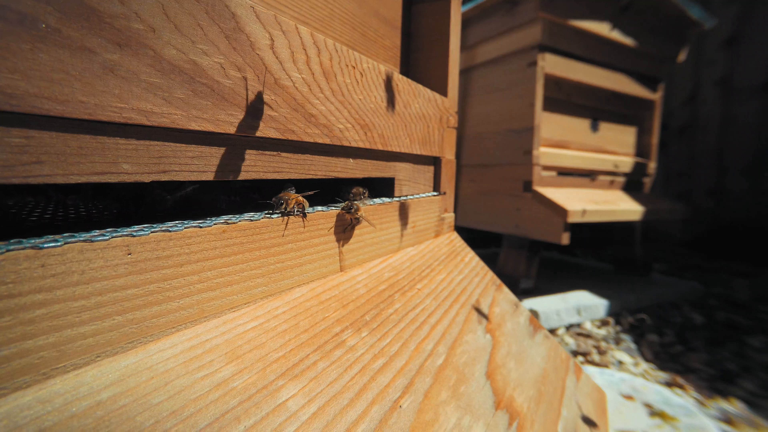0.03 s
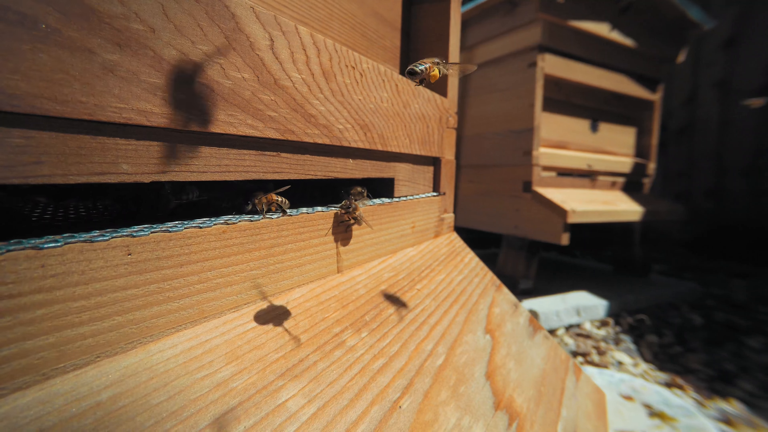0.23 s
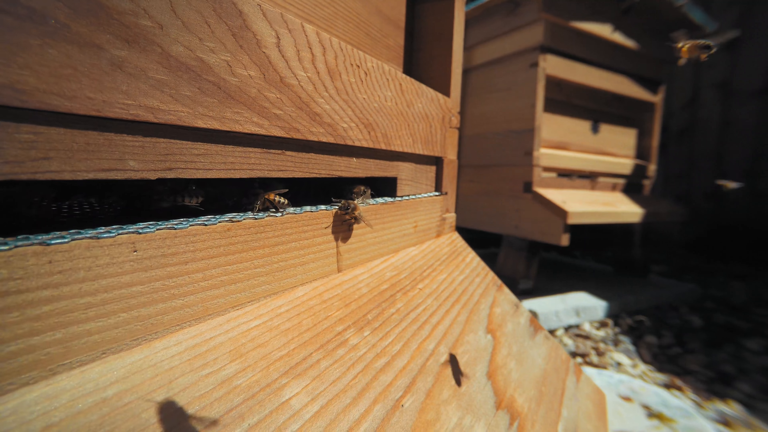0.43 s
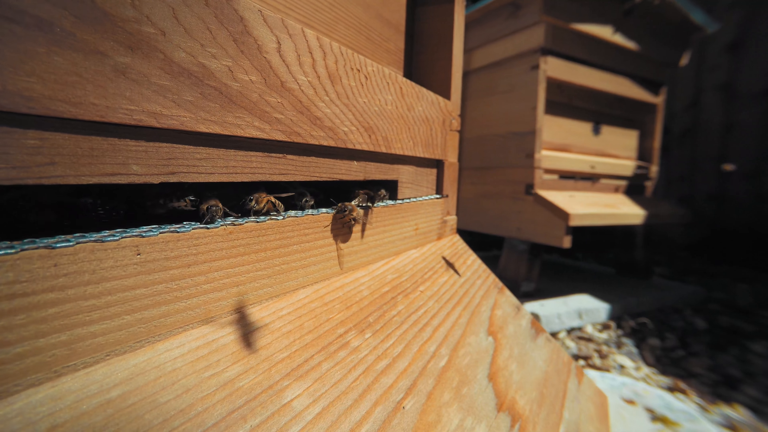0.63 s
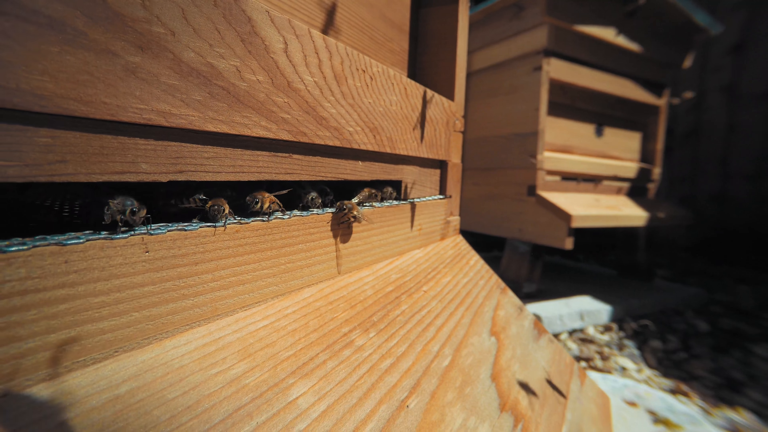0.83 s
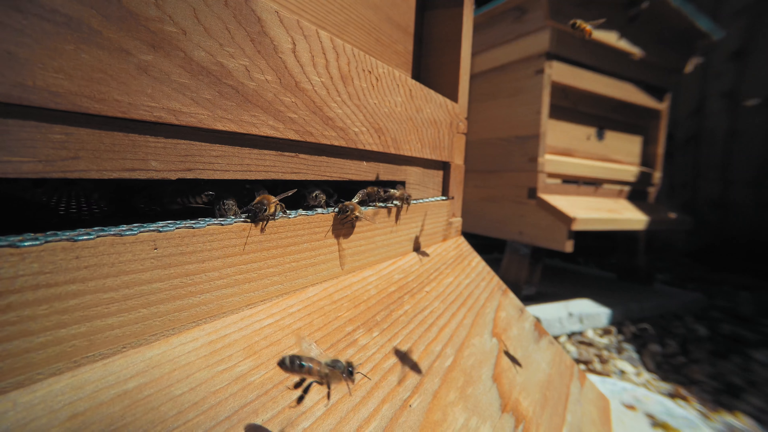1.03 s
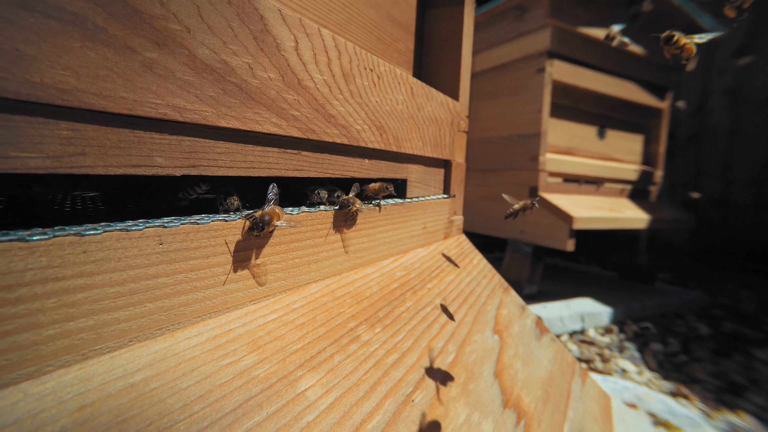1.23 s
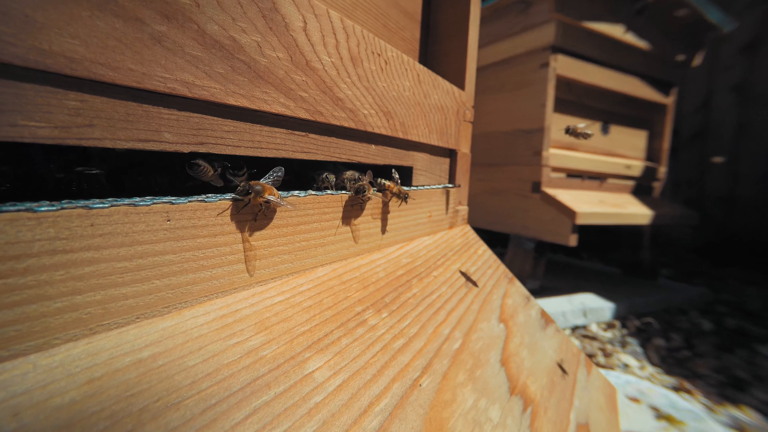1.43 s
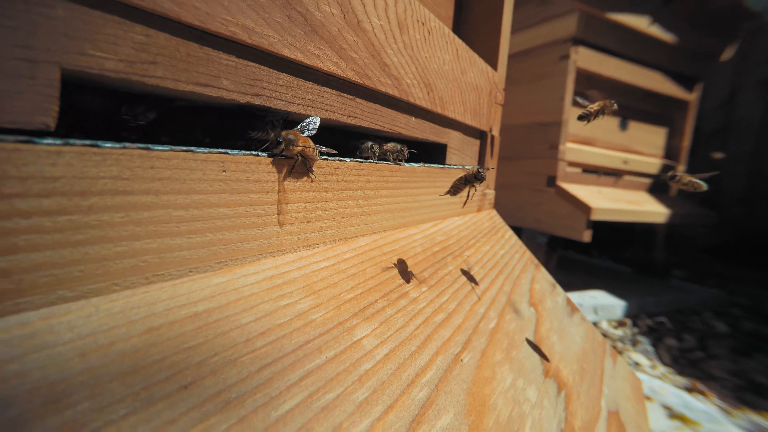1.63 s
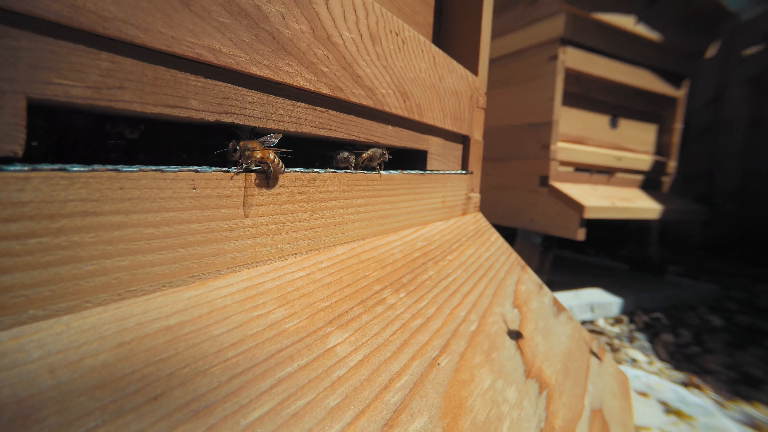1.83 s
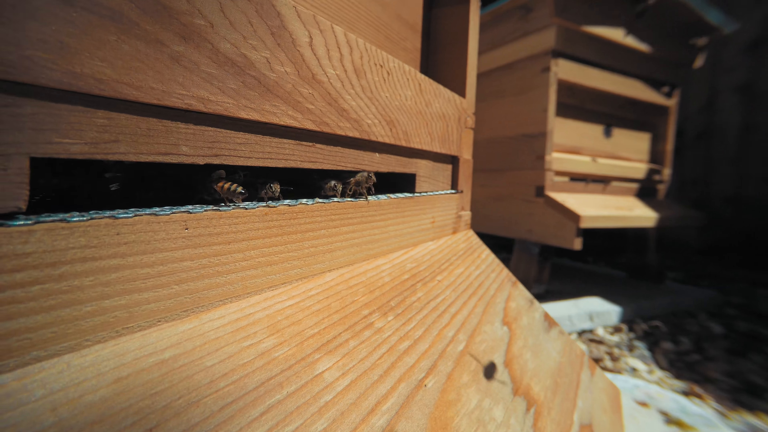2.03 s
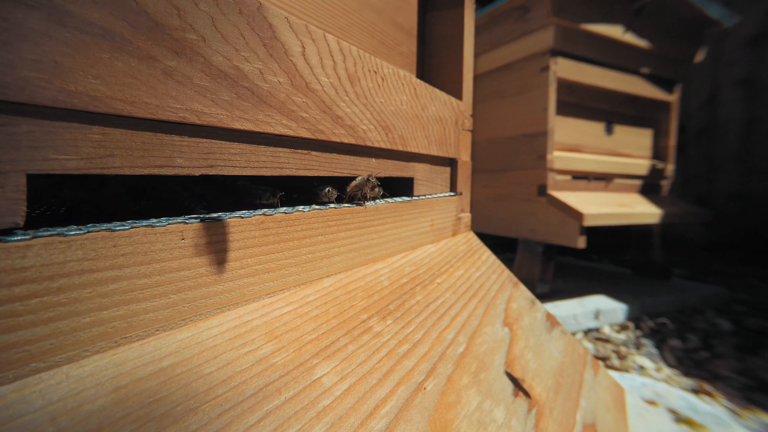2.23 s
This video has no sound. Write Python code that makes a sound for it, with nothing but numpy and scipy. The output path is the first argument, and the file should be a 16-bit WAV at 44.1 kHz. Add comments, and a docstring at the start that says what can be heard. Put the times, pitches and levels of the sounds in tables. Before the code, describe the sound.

A honeybee buzzes close by with a wavering hum, other bees faint behind it.

```python
"""A honeybee hovers close by at the entrance of a wooden hive, outdoors; the sound fades in.
Its wingbeat makes a wavering hum, a rasp of upper harmonics and a puff of air on every stroke,
with a brief swish as it arrives. Other bees buzz behind it, over a faint low drone and the open air."""
import sys
import numpy as np
from scipy import signal
from scipy.fft import rfft, irfft, next_fast_len
from scipy.io import wavfile
from scipy.ndimage import uniform_filter1d

SR = 44100
rng = np.random.default_rng(int(sys.argv[2]) if len(sys.argv) > 2 else 0)


def pcm_store(signal):
    """Save signal as 16-bit PCM."""
    levels = np.round(np.clip(np.atleast_2d(signal), -1, 1) * 32767)
    wavfile.write(sys.argv[1], SR, levels.astype(np.int16).T)


N = 101429

# envelope of the near bee's hum, led by the second harmonic: (time [s], level [dB])
HUM_ENVELOPE = [(0.13, -81.5), (0.222, -63.5), (0.585, -51.8), (0.657, -42), (0.904, -40.7), (0.916, -36),
                (1.036, -39), (1.076, -33.5), (1.339, -35.5), (1.367, -32.6), (1.435, -36), (1.463, -34.5),
                (1.511, -35.5), (1.675, -35), (2.014, -33.5), (2.042, -35), (2.058, -29), (2.086, -38.5),
                (2.114, -32), (2.15, -34.5), (2.19, -32), (2.209, -34.5), (2.292, -29.5)]


def from_db(db):
    """Decibels to gain."""
    return 10 ** (np.asarray(db) / 20)


def unit_rms(x):
    """Scale to unit rms."""
    return x / np.sqrt(np.mean(x ** 2) + 1e-20)


def automation(points):
    """A breakpoint curve at every sample."""
    return np.interp(np.arange(N) / SR, *np.transpose(points))


def gain_at(colour, hz):
    """Gain of an EQ curve at given frequencies."""
    points_hz, db = np.transpose(colour)
    return from_db(np.interp(np.log(np.maximum(hz, 1)), np.log(points_hz), db))


def drift(rate_hz):
    """Smooth random modulation of unit rms."""
    hop, run_in = 40, 2000
    pole = np.exp(-2 * np.pi * hop * rate_hz / SR)
    noise = rng.standard_normal(N // hop + run_in + 2)
    slow = signal.lfilter([1], [1, -2 * pole, pole * pole], noise)[run_in:]
    return np.interp(np.arange(N) / hop, np.arange(len(slow)), unit_rms(slow))


def coloured(x, colour):
    """Shape a sound with an EQ curve; unit rms."""
    size = next_fast_len(N + SR // 10)
    spectrum = rfft(x, size) * gain_at(colour, np.fft.rfftfreq(size, 1 / SR))
    return unit_rms(irfft(spectrum, size)[:N])


def buzz(phase, hz, orders, colour, shimmer, shimmer_hz, smear_rad=np.pi):
    """Wingbeat harmonics, each shimmering as the bee turns; little smear keeps the strokes distinct."""
    out = 0
    for k in orders:
        angle = k * phase + smear_rad * rng.standard_normal()
        in_phase = (1 + shimmer * drift(shimmer_hz)) * np.cos(angle)
        quadrature = shimmer * drift(shimmer_hz) * np.sin(angle)
        out = out + gain_at(colour, k * hz) * unit_rms(in_phase + quadrature)
    return unit_rms(out)


def stroke_gain(phase, spread_db):
    """A random gain held for each wing stroke."""
    stroke = (phase / (2 * np.pi) + .5).astype(int)
    return from_db(spread_db * np.clip(rng.standard_normal(N), -2, 2)[stroke])


def open_air():
    """A soft noise bed of open air and the far rustle of wings."""
    # tone of the air: (frequency [Hz], relative level [dB])
    air_colour = [(40, -8.5), (380, 5), (1000, -0.5), (2500, -8), (4000, -7), (5200, -14), (7800, -11),
                  (11000, -26)]
    return from_db(-55) * coloured(rng.standard_normal(N), air_colour)


def drone(wander_hz=2.41):
    """Faint low tones in the distance that waver a little."""
    # tones of the drone: (frequency [Hz], relative level [dB])
    tones = [(111, -73.5), (138, -74.5), (179, -71)]
    out = 0
    for hz, db in tones:
        phase = 2 * np.pi * np.cumsum(hz + wander_hz * drift(8.7)) / SR
        out = out + from_db(db) * np.sin(phase)
    return np.sqrt(2) * out


def other_bees(wander=.04):
    """Bees farther off, each wandering in pitch around its own wingbeat rate."""
    # one row a bee: (wingbeat rate [Hz], relative level [dB])
    bees = [(240, -57), (266, -55.5), (283, -58)]
    # tone of their buzz: (frequency [Hz], relative level [dB])
    swarm_colour = [(240, -2.5), (500, 0), (1000, 0.5), (1500, -9), (3000, -38), (4000, -12), (5000, -36)]
    out = 0
    for hz, db in bees:
        phase = 2 * np.pi * np.cumsum(hz * (1 + wander * drift(7))) / SR
        voice = buzz(phase, hz, range(1, 19), swarm_colour, shimmer=0.55, shimmer_hz=15.7)
        out = out + from_db(db) * voice
    return out


def background():
    """The open air, the other bees and the drone fade in together."""
    # fader of the bed: (time [s], gain [dB])
    fade_in = [(0, -95), (.075, -49), (.115, -22), (.25, -8), (.55, -2), (.95, 4.5), (2.3, 4)]
    return from_db(automation(fade_in)) * (open_air() + other_bees() + drone())


def swish(at_s=0.64, width_s=0.18, notch_hz=7700, fall_oct_per_s=3.5):
    """Wing noise swells and fades near the hive's board, whose lengthening echo cuts a falling notch."""
    # tone of the wing noise: (frequency [Hz], relative level [dB])
    swish_colour = [(3000, -16), (5500, 4), (11000, -5.5)]
    t = np.arange(N) / SR - at_s
    noise = coloured(rng.standard_normal(N), swish_colour)
    lag_s = .5 / (notch_hz * 2 ** (-fall_oct_per_s * t))
    echo = 0.5 * np.interp(t - lag_s, t, noise)
    return from_db(-58) * np.exp(-(t / width_s) ** 2) * (noise + echo)


def wing_hiss(phase, sharpness=5, floor=.28, trim_db=5.5, gust_db=1.22):
    """A puff of uneven strength at each stroke reversal, a weaker one on the way back."""
    # envelope of the hiss at the wing tips: (time [s], relative level [dB])
    hiss_envelope = [(0.11, -90), (0.295, -71), (0.465, -71), (0.8, -57), (2.09, -53), (2.16, -52),
                     (2.22, -53.5)]
    # tone of the hiss: (frequency [Hz], relative level [dB])
    hiss_colour = [(900, -4.5), (1900, 3), (2600, -1), (4100, 3.5), (4900, -9), (6900, -17), (8100, -1),
                   (10600, -12.5), (11700, -5.5), (13000, 3), (14300, -1.5), (15700, -6)]
    puff = stroke_gain(phase, spread_db=2) * np.exp(sharpness * (np.cos(phase) - 1))
    return_puff = 0.29 * np.exp(-sharpness * (np.cos(phase) + 1))
    level = from_db(trim_db + automation(hiss_envelope) + gust_db * drift(19))
    return level * coloured(rng.standard_normal(N) * (floor + puff + return_puff), hiss_colour)


def rasp(phase, hz, jitter_rad=0.022):
    """Upper harmonics roughened by uneven stroke timing; churned air swells on both half strokes."""
    # envelope of the rasp: (time [s], relative level [dB])
    rasp_envelope = [(0.09, -79.5), (0.28, -69.5), (0.61, -52.5), (0.655, -49), (0.92, -45.5),
                     (1.035, -47.5), (1.08, -43.5), (2.285, -41.5)]
    # tone of the upper harmonics: (frequency [Hz], relative level [dB])
    rasp_colour = [(1000, 0), (1270, 3), (1560, 1), (2000, -0.5), (2500, -8), (2800, -6), (3200, -18),
                   (4050, -11), (5200, -36)]
    # tone of the air churned by the wings: (frequency [Hz], relative level [dB])
    churn_colour = [(150, -10), (310, 3), (600, 13), (1000, 6), (2000, -1.5), (2500, -8), (3300, -4),
                    (4100, 1), (4800, -27), (6500, -33)]
    rough_phase = phase + jitter_rad * drift(120)
    tones = buzz(rough_phase, hz.mean(), range(4, 21), rasp_colour,
                 shimmer=0.39, shimmer_hz=22.6, smear_rad=1.85)
    churn = coloured(rng.standard_normal(N) * (1 + 0.58 * np.cos(2 * phase)), churn_colour)
    uneven = uniform_filter1d(stroke_gain(phase, spread_db=0.5), size=SR // 1000)
    return from_db(automation(rasp_envelope)) * uneven * (from_db(-0.5) * tones + from_db(-6) * churn)


def hum(phase, flutter_db=0.96):
    """Three clean harmonics peak together on each stroke; the odd ones dip as the bee turns side-on."""
    # fundamental against the second harmonic: (time [s], level [dB])
    fundamental = [(0.25, -2.5), (0.6, -0.5), (0.73, -8.5), (1.15, -11.5), (1.95, -9), (2.28, -4.5)]
    # third harmonic against the second: (time [s], level [dB])
    third = [(0.66, -14.5), (0.85, -1), (1.14, -8.5), (1.51, -1), (2.28, -3)]
    # side-on turns: (time [s], half-width [s], dip of the third harmonic [dB])
    turns = [(0.768, 0.014, -14), (0.904, 0.019, -33), (1.142, 0.0067, -18), (1.238, 0.0094, -13),
             (1.375, 0.022, -7), (1.475, 0.01, -29), (1.59, 0.027, -11.5), (1.755, 0.014, -20),
             (1.896, 0.013, -11), (2.076, 0.0048, -9)]
    t = np.arange(N) / SR
    dip_db = sum(db * np.exp(-np.abs(t - at_s) / width_s) for at_s, width_s, db in turns)
    levels_db = [automation(fundamental) + 0.41 * dip_db, 0, automation(third) + dip_db]
    tone = sum(from_db(db + flutter_db * drift(55)) * np.cos(k * phase)
               for k, db in enumerate(levels_db, start=1))
    return -np.sqrt(2) * from_db(automation(HUM_ENVELOPE)) * tone


def surge(hz, follow=0.57, span_s=0.1, effort_db_per_hz=0.0861):
    """Gain of rasp and hiss: they ride the hum's quick swings and swell with faster wingbeats."""
    hum_db = automation(HUM_ENVELOPE)
    swing_db = hum_db - uniform_filter1d(hum_db, size=int(span_s * SR), mode="nearest")
    return from_db(follow * swing_db + effort_db_per_hz * (hz - hz.mean()))


def near_bee(jitter=0.00509, dart_db=3.5, dart_width_s=0.0078):
    """One wingbeat drives hum, rasp and hiss; the rasp swells as the bee darts closer, the hum less so."""
    # pitch of the bee as it steers: (time [s], wingbeat rate [Hz])
    wingbeat = [(0.17, 249.2), (0.238, 268.7), (0.318, 242.2), (0.398, 257.9), (0.577, 262), (0.601, 249.9),
                (0.665, 264.1), (0.737, 236.4), (0.765, 263.5), (0.805, 242.6), (0.869, 234),
                (0.888, 264.8), (1.004, 242.4), (1.088, 259.3), (1.12, 250.2), (1.14, 262), (1.2, 252.2),
                (1.212, 238.3), (1.236, 259.1), (1.292, 237.9), (1.312, 253.8), (1.331, 242.0),
                (1.363, 263.8), (1.431, 242.4), (1.459, 265.9), (1.515, 238.5), (1.595, 255.1),
                (1.635, 249.3), (1.651, 260.7), (1.695, 241.4), (1.707, 253.3), (1.731, 244.6),
                (1.747, 260.1), (1.782, 240.3), (1.866, 259.3), (1.878, 246.3), (1.918, 255.3),
                (1.946, 246.6), (2.006, 261.6), (2.038, 238), (2.058, 260.5), (2.094, 238.3),
                (2.126, 256.7), (2.15, 240), (2.19, 250.4), (2.249, 233), (2.265, 249.5), (2.29, 243.5)]
    # brief darts closer: (time [s])
    darts = [0.968, 1.746, 1.862, 1.963, 2.113]
    t = np.arange(N) / SR
    hz = automation(wingbeat) * (1 + jitter * drift(58.4))
    phase = 2 * np.pi * np.cumsum(hz) / SR
    dart = from_db(dart_db * sum(np.exp(-((t - at_s) / dart_width_s) ** 2) for at_s in darts))
    return np.sqrt(dart) * hum(phase) + surge(hz) * (dart * rasp(phase, hz) + wing_hiss(phase))


def scene(start_s=.075, ramp_s=0.041):
    """The near bee and its swish in front of the background, in mono, ramped up from silence."""
    opening = np.clip((np.arange(N) / SR - start_s) / ramp_s, 0, 1)
    return (opening * (background() + near_bee() + swish()))[None]


def record(dry, cutoff_hz=15800):
    """A steep low-pass takes off the very top."""
    return signal.sosfilt(signal.ellip(12, .1, 80, cutoff_hz, fs=SR, output="sos"), dry)


dry = scene()
out = record(dry)
pcm_store(out)
```